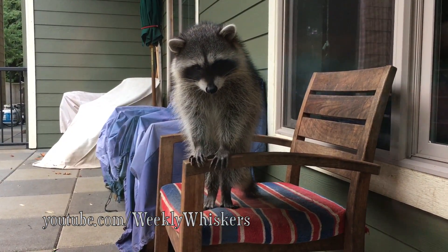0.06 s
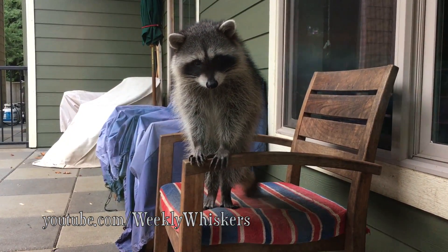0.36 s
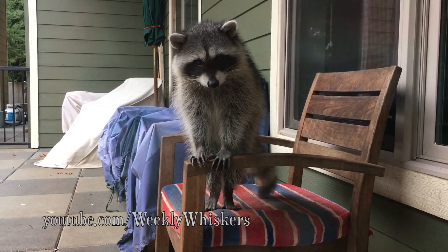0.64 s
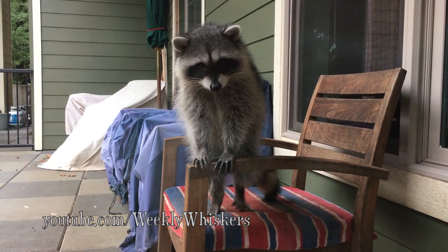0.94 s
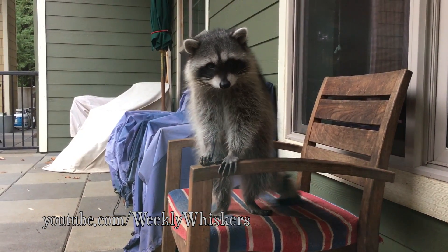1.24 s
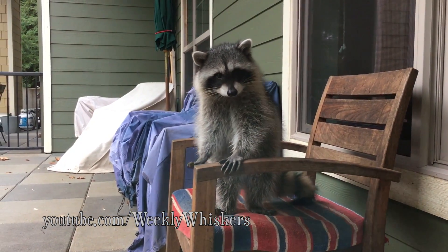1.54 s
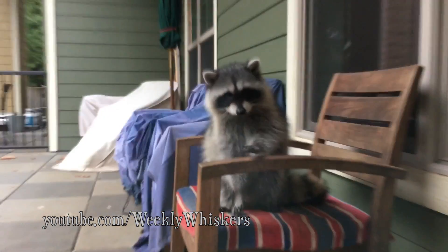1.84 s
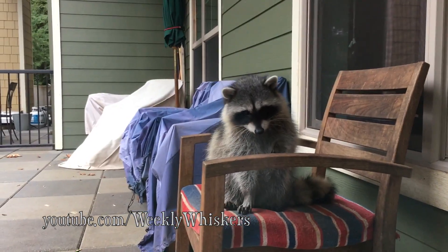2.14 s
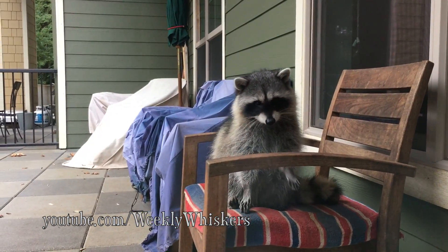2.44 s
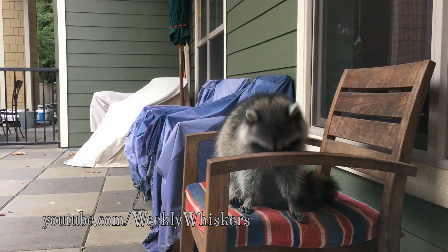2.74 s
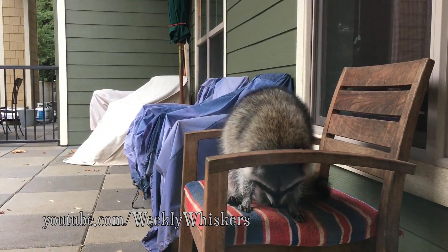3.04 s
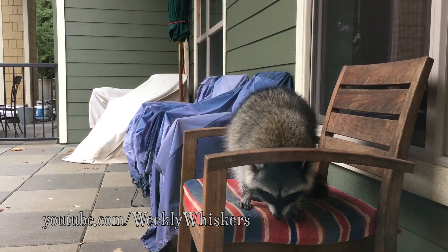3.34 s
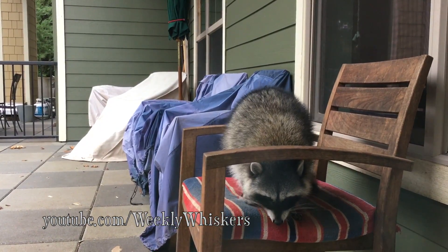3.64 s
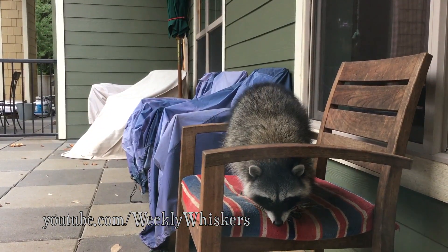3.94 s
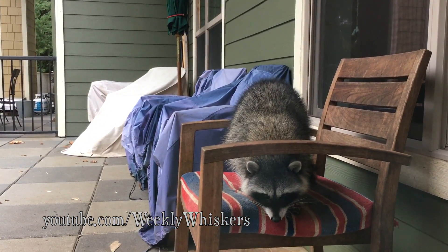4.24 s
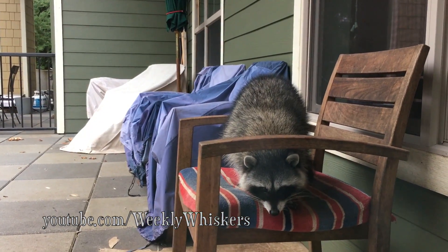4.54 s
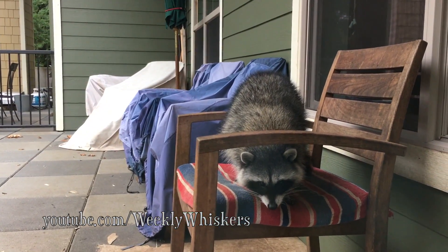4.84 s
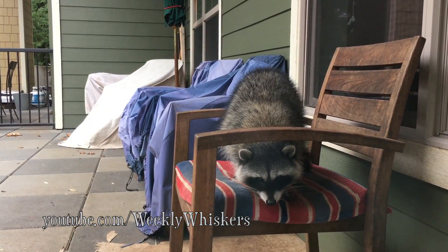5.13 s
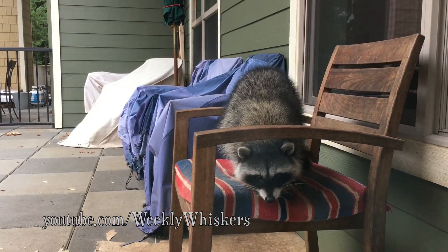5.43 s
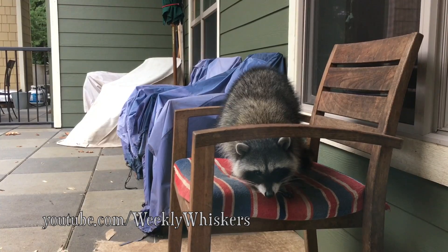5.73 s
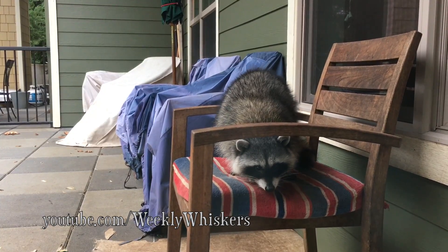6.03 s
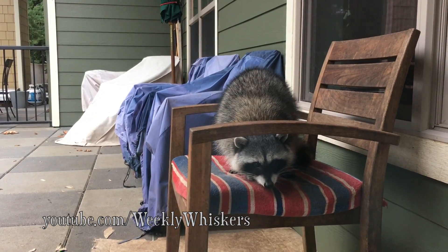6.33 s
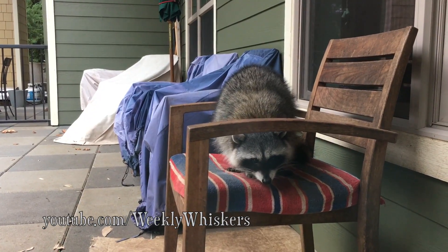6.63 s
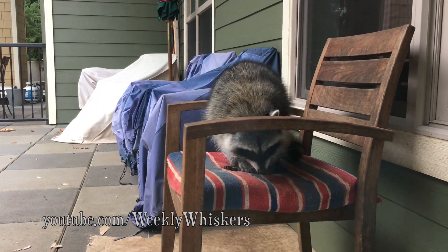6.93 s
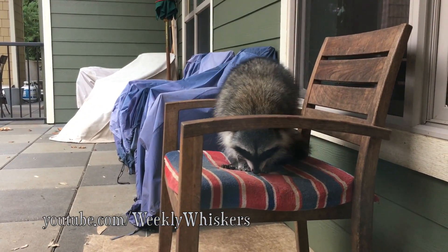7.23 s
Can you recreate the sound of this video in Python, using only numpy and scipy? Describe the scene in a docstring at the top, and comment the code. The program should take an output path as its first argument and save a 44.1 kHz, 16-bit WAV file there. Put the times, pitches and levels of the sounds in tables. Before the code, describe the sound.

One short thump stands out against a quiet outdoor background: a raccoon's paws knock a wooden chair frame and its weight drops onto the seat, ringing briefly under the porch roof. Then come soft padded steps, light scuffs and small ticks of claws in the cushion fabric. Far traffic rumbles and swells throughout, with light microphone hiss and a barely audible high whine.

```python
"""Far traffic rumbles and swells in the hollow of a quiet covered porch, over soft microphone hiss.
A thin electric whine comes and goes. A raccoon climbs down from the armrest of a wooden chair and
lands with one short thump: its paws knock the frame, its weight booms the seat, the porch rings on.
It then noses about on the cushion: soft treads, fur and paws rubbing, claws catching in the cloth."""
import sys
import numpy as np
from scipy import signal
from scipy.fft import rfft, irfft
from scipy.io import wavfile
from scipy.ndimage import uniform_filter1d

SR = 44100
rng = np.random.default_rng(int(sys.argv[2]) if len(sys.argv) > 2 else 0)


def to_wav(s):
    """Save 16-bit WAV."""
    ch = np.atleast_2d(s).T  # columns
    pcm = np.round(np.clip(ch, -1, 1) * 32767)  # PCM
    wavfile.write(sys.argv[1], SR, pcm.astype(np.int16))


N = 329868

# microphone hiss (frequency [Hz], relative density [dB])
HISS_SPECTRUM = [(500, 9.5), (950, -2.5), (1400, -4.5), (2000, -11.5), (2800, -15), (3300, -8.5),
                 (4300, -9.5), (4900, -11), (5700, -7), (7700, -8), (9200, -6), (10400, -18), (11400, -11),
                 (15800, -15.5)]
# electric whine (onset [s], level [dB], attack [s])
WHINE_SPELLS = [(1.5, -94.5, .12), (6.3, -97.5, .9)]
# far traffic rumble (time [s], relative level [dB])
RUMBLE_ENVELOPE = [(0, -62), (.3, -73.5), (.58, -65.5), (1.0, -73.5), (1.68, -63.5), (2.12, -72),
                   (2.35, -65), (3.5, -65), (3.8, -67), (4.3, -62.5), (4.85, -66.5), (7.48, -65.5)]
# rumble (frequency [Hz], relative density [dB])
RUMBLE_SPECTRUM = [(20, -21), (42, -3), (62, 0), (88, -0.5), (108, -6.5), (135, -8), (155, -16),
                   (215, -15.5)]
# traffic wash (frequency [Hz], relative density [dB])
WASH_SPECTRUM = [(150, -5.5), (215, -1.5), (232, -3), (290, 1.5), (340, -7), (375, -6), (420, -13),
                 (500, -12), (630, -10), (780, -26), (1300, -35.5)]
# hollow porch tones in the wash (frequency [Hz], relative level [dB], T60 [s])
WASH_MODES = [(268, -5.5, 0.16), (289.6, -8.5, .16), (369, -13, 0.18), (494.7, -12, 0.097)]
# far vehicles (peak time [s], relative level [dB], rise [s])
VEHICLE_PASSES = [(1.22, -66.5, 0.13), (2.48, -68, .24), (4.13, -63.5, 0.24), (4.95, -65.5, 0.43),
                  (7.2, -72.5, 0.14)]
# low hum in the wash (peak time [s], relative level [dB])
HUM_SURGES = [(1.18, -65.5), (1.48, -63.5), (4.22, -62), (4.87, -68.5), (5.37, -72)]
# deep drones (peak time [s], relative level [dB], half width [s], frequency [Hz])
DRONE_SWELLS = [(4.502, -64, .3, 50), (5.35, -67, 0.31, 48), (6.7, -60, .3, 68)]
# faint high swishes (peak time [s], level [dB], half width [s])
SWISH_SWELLS = [(2.66, -95, 0.08), (5.52, -86.5, 0.24)]
# swishes (frequency [Hz], relative density [dB])
SWISH_SPECTRUM = [(2000, 0), (2450, 6), (2750, -6)]
# porch wall reverberation (frequency [Hz], T60 [s])
PORCH_T60 = [(60, 0.65), (300, .22), (750, 0.13), (1300, 0.12), (8000, 0.049)]
# porch air resonances (frequency [Hz], gain [dB], T60 [s])
PORCH_AIR_MODES = [(268.7, -41, .278), (555.5, -44, 0.2), (740, -28, 0.095)]
# fur on cloth (time [s], level [dB])
FUR_ENVELOPE = [(0, -83), (1.8, -82.5), (2.12, -81), (3.8, -81), (4.4, -79.5), (6.15, -80.5), (6.6, -80),
                (7.48, -80.5)]
# fur on cloth (frequency [Hz], relative density [dB])
FUR_SPECTRUM = [(500, -1), (900, 1), (1200, -4), (1850, -1.5), (2400, -5), (2850, -8.5), (3300, -7),
                (4200, -8.5), (4900, -12.5), (5700, -10), (8000, -17.5), (14000, -15.5)]
# claws in cloth (time [s], relative peak [dB], band centre [Hz])
CLAW_CATCHES = [(.985, -66, 1600), (2.122, -67, 1700), (2.4778, -68.5, 4800), (2.861, -65.5, 1703),
                (3.42, -69, 4300), (3.618, -62.5, 2206), (3.711, -67, 4330), (3.9864, -66, 4605),
                (4.916, -65.5, 2400), (6.1175, -65, 4254)]
# paw drags (peak time [s], level [dB], half width [s])
SCUFF_SWELLS = [(2.169, -81, .13), (4.44, -86, 0.12), (6.572, -76.5, 0.051), (6.802, -82, 0.11)]
# paw drags (frequency [Hz], relative density [dB])
SCUFF_SPECTRUM = [(600, 3), (980, 4), (1170, -3), (1400, -1.5), (2100, -5.5), (2600, -15)]
# weight shifts on the cushion (time [s], impulse [dB])
TREAD_CONTACTS = [(0.873, -29.5), (3.488, -26.5), (4.42, -30), (4.861, -28), (5.13, -29.5), (5.921, -24),
                  (6.488, -26.5), (6.879, -27)]
# claws on wood (time [s], level [dB])
CLAW_CLICKS = [(1.9156, -48.5), (1.9181, -44), (1.9186, -49), (1.9271, -61), (1.9297, -58)]
# claws on wood (frequency [Hz], relative density [dB])
CLICK_SPECTRUM = [(2000, 11.5), (4300, -2), (5000, -5.5), (5700, -2), (7700, -9), (10000, -20.5),
                  (15000, -30)]
# paw slides and lands, chair knocks back (time [s], impulse [dB], cutoff [Hz])
FRAME_CONTACTS = [(1.8924, -31.5, 447), (1.9031, -17, 450), (1.9084, -4, 210), (1.9121, -4, 200.5),
                  (1.9155, -0.5, 1780), (1.9166, -16.5, 1780), (1.9182, 8.5, 150), (1.926, -15, 1015),
                  (1.9299, -26, 942)]
# wooden frame, some modes in close pairs (frequency [Hz], relative gain [dB], T60 [s])
FRAME_MODES = [(169, -23.5, 0.048), (288.2, -29.5, 0.059), (366, -18, 0.05), (452, -24, 0.028),
               (565, -25.5, 0.03964), (567.5, -17.5, 0.033), (673, -20, 0.026), (850, -12, 0.016),
               (989, -12, 0.023), (996.5, -21.5, 0.037), (1320, -13.5, 0.0082), (1630, -31, 0.005),
               (1820, -44.5, 0.009), (2214, -21.5, 0.007), (3140, -38.5, 0.021), (3470, -41.5, 0.022),
               (4080, -32.5, 0.022)]
# body weight meets the cushion (time [s], impulse [dB], cutoff [Hz])
LANDING_CONTACT = [(1.9225, 6.6, 212.4)]
# seat under the cushion (frequency [Hz], gain [dB], T60 [s])
SEAT_MODES = [(59, -41.5, 0.078), (92, -21.5, .056)]


def from_db(db):
    """Decibels to gain."""
    return 10 ** (np.asarray(db) / 20)


def unit_rms(x):
    """Scale to rms 1."""
    return x / np.sqrt(np.mean(x ** 2) + 1e-30)


def envelope(rows):
    """Gain per sample from (time [s], level [dB])."""
    time_s, db = np.transpose(rows)
    return from_db(np.interp(np.arange(N) / SR, time_s, db))


def swell(peak_s, db, rise_s, fall_ratio=1):
    """Bell-shaped gain, 1/e at rise_s before the peak."""
    t = np.arange(N) / SR - peak_s
    width_s = np.where(t < 0, rise_s, rise_s * fall_ratio)
    return from_db(db) * np.exp(-(t / width_s) ** 2)


def drift(samples=2048):
    """Slow random wander, rms 1."""
    return unit_rms(uniform_filter1d(uniform_filter1d(rng.standard_normal(N), samples), samples))


def at_hz(rows, hz):
    """Interpolate on a log-frequency axis."""
    knots_hz, values = np.transpose(rows)
    return np.interp(np.log(hz), np.log(knots_hz), values)


def noise(spectrum):
    """Shaped noise, rms 1; falls 24 dB/octave beyond the table."""
    hz = np.maximum(np.arange(N // 2 + 1) * SR / N, 1)
    skirts = np.minimum(1, np.minimum(hz / spectrum[0][0], spectrum[-1][0] / hz)) ** 4
    white = rfft(rng.standard_normal(N))
    return unit_rms(irfft(white * from_db(at_hz(spectrum, hz)) * skirts, N))


def lowpass(x, hz):
    """Second-order low-pass."""
    return signal.sosfilt(signal.butter(2, hz, fs=SR, output="sos"), x)


def octave_band(x, hz, order):
    """Band-pass, one octave wide."""
    edges_hz = [hz / np.sqrt(2), hz * np.sqrt(2)]
    return signal.sosfilt(signal.butter(order, edges_hz, "band", fs=SR, output="sos"), x)


def ring(force, hz, t60_s):
    """One damped mode; a steady force makes no sound."""
    radius = np.exp(-np.log(1000) / (t60_s * SR))
    angle = 2 * np.pi * hz / SR
    return signal.lfilter([.5, 0, -.5], [1, -2 * radius * np.cos(angle), radius ** 2], force + 1e-18)


def resonate(force, modes, neighbour_ratio=1):
    """Modes driven by one force; a negative ratio swings neighbours against each other."""
    return sum(neighbour_ratio ** k * from_db(db) * ring(force, hz, t60_s)
               for k, (hz, db, t60_s) in enumerate(modes))


def contact_force(contacts):
    """One pulse per contact; softer contact, lower cutoff, longer pulse."""
    force = np.zeros(N)
    for time_s, db, cutoff_hz in contacts:
        impulse = np.zeros(N)
        impulse[round(time_s * SR)] = from_db(db)
        force += lowpass(impulse + 1e-18, cutoff_hz)
    return force


def microphone(hiss_db=-84, whine_hz=5606, rest_db=-107, fade_after_s=1.2, fade_db_per_s=6, flutter_db=1):
    """Steady hiss; an electric whine sets in, holds and dies away."""
    t = np.arange(N) / SR
    gain = from_db(rest_db)
    for onset_s, db, attack_s in WHINE_SPELLS:
        attack = np.clip((t - onset_s) / attack_s, 0, 1)
        fade_db = fade_db_per_s * np.maximum(t - onset_s - fade_after_s, 0)
        gain = np.maximum(gain, attack * from_db(db - fade_db))
    whine = gain * from_db(flutter_db * drift()) * np.sqrt(2) * np.sin(2 * np.pi * whine_hz * t)
    return from_db(hiss_db) * noise(HISS_SPECTRUM) + whine


def traffic(rumble_gain_db=2.5, rumble_drift_db=2, wash_gain_db=-4.5, wash_drift_db=1.2, lull_db=-70):
    """Uneven rumble, plus a wash that swells with each pass and sounds the hollow porch tones."""
    tones = sum(from_db(db) * unit_rms(ring(rng.standard_normal(N), hz, t60_s))
                for hz, db, t60_s in WASH_MODES)
    pass_power = sum(swell(*row, fall_ratio=2.23) ** 2 for row in VEHICLE_PASSES)
    flow = np.sqrt(from_db(lull_db) ** 2 + pass_power)
    wash = flow * from_db(wash_gain_db + wash_drift_db * drift()) * (noise(WASH_SPECTRUM) + tones)
    rumble_gain = envelope(RUMBLE_ENVELOPE) * from_db(rumble_gain_db + rumble_drift_db * drift())
    return rumble_gain * noise(RUMBLE_SPECTRUM) + wash


def hum(hz=262, waver=.018, gain_db=-2, flutter_db=1.5, rest_db=-83, rise_s=.081):
    """A low wavering tone surges briefly out of the wash."""
    phase = 2 * np.pi * np.cumsum(hz * (1 + waver * drift())) / SR
    surges = from_db(rest_db) + sum(swell(peak_s, db, rise_s) for peak_s, db in HUM_SURGES)
    return surges * from_db(gain_db + flutter_db * drift()) * np.sqrt(2) * np.sin(phase)


def drones(t60_s=.12, cutoff_hz=130):
    """Swells under the rumble, each noise in one low resonance."""
    swells = sum(swell(peak_s, db, rise_s) * unit_rms(ring(rng.standard_normal(N), hz, t60_s))
                 for peak_s, db, rise_s, hz in DRONE_SWELLS)
    return lowpass(swells, cutoff_hz)


def swishes():
    """Distant narrow-band noise swells and fades."""
    return noise(SWISH_SPECTRUM) * sum(swell(*row) for row in SWISH_SWELLS)


def porch_reverb(x, build_s=.008, samples=16384):
    """Diffuse reflections off walls and roof; treble dies first."""
    t = np.arange(samples) / SR
    white = rng.standard_normal(samples)
    tail = sum(octave_band(white, hz, order=2) * np.exp(-np.log(1000) * t / at_hz(PORCH_T60, hz))
               for hz in np.geomspace(60, 7680, 8))
    tail *= 1 - np.exp(-t / build_s)
    return signal.fftconvolve(x, tail / np.sqrt(np.sum(tail ** 2)))[:N]


def fur_brush():
    """Fur rubs softly on the cloth."""
    return envelope(FUR_ENVELOPE) * noise(FUR_SPECTRUM)


def weave_crackle(rate_per_s=16, gain_db=-71, hz=4400, t60_s=.0061):
    """The weave ticks at random once the animal has landed."""
    landed = np.arange(N) / SR > LANDING_CONTACT[0][0]
    ticks = (rng.random(N) < rate_per_s / SR) & landed
    return from_db(gain_db) * ring(ticks * rng.uniform(-.99, 1, N), hz, t60_s)


def claw_catches(gain_db=-3, decay_s=.0028, samples=1024):
    """Each claw scrapes a few threads in a tiny burst."""
    out = np.zeros(N)
    decay = np.exp(-np.arange(samples) / (decay_s * SR))
    for time_s, db, hz in CLAW_CATCHES:
        burst = octave_band(rng.standard_normal(samples) * decay, hz, order=1)
        start = round(time_s * SR)
        out[start:start + samples] += from_db(db + gain_db) * burst / np.abs(burst).max()
    return out


def paw_scuffs():
    """A paw drags over the cushion: short dull swells of friction."""
    return noise(SCUFF_SPECTRUM) * sum(swell(*row) for row in SCUFF_SWELLS)


def treads(cutoff_hz=140):
    """Shifting weight bumps the seat through padded paws."""
    force = contact_force([(time_s, db, cutoff_hz) for time_s, db in TREAD_CONTACTS])
    return resonate(force, SEAT_MODES)


def claw_clicks(decay_s=.00038, samples=256):
    """Claws strike the wood, one short bright click each."""
    gate = np.zeros(N)
    decay = np.exp(-np.arange(samples) / (decay_s * SR))
    for time_s, db in CLAW_CLICKS:
        start = round(time_s * SR)
        gate[start:start + samples] += from_db(db) * decay
    return gate * noise(CLICK_SPECTRUM)


def landing_thump(reverb_db=-34):
    """The frame knocks, the seat booms under the weight, the porch rings on."""
    weight = contact_force(LANDING_CONTACT)
    frame = resonate(contact_force(FRAME_CONTACTS), FRAME_MODES, neighbour_ratio=-.99)
    chair = resonate(weight, SEAT_MODES) - frame + claw_clicks()
    return chair + resonate(weight, PORCH_AIR_MODES) + from_db(reverb_db) * porch_reverb(chair)


def scene():
    """Raccoon and chair over the outdoor background, mono."""
    raccoon = landing_thump() + treads() + fur_brush() + claw_catches() + paw_scuffs() + weave_crackle()
    background = traffic() + hum() + swishes() + microphone() + drones()
    return (raccoon + background)[None]


def record(dry):
    """Steep treble cut."""
    cutoff_hz = 15750
    return signal.sosfilt(signal.ellip(10, .1, 80, cutoff_hz, fs=SR, output="sos"), dry)


dry = scene()
out = record(dry)
to_wav(out)
```